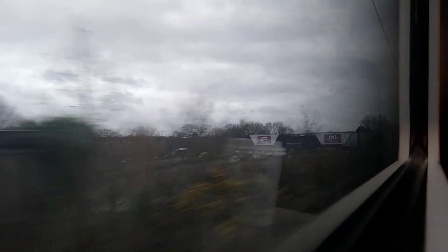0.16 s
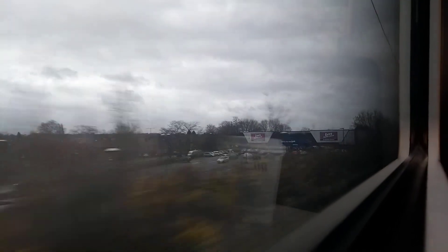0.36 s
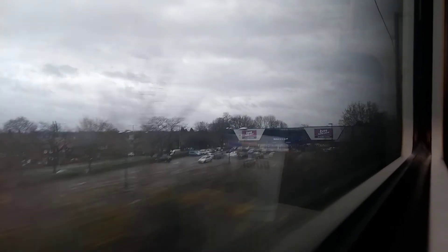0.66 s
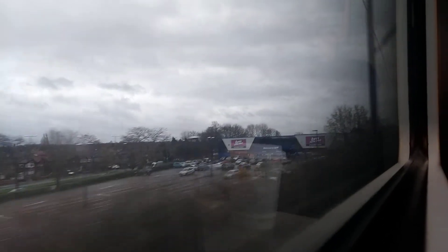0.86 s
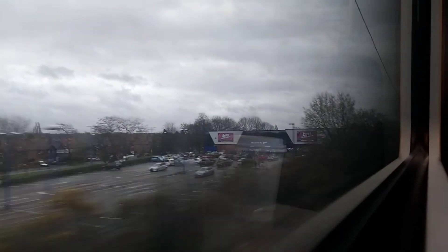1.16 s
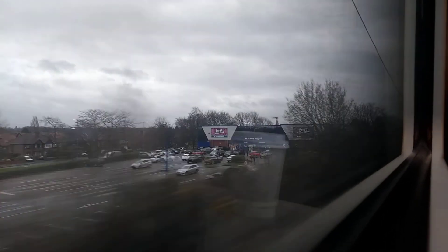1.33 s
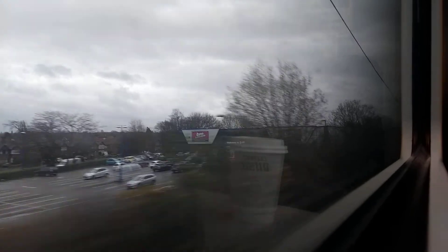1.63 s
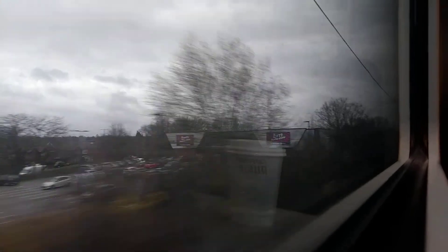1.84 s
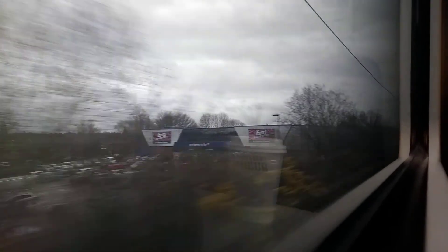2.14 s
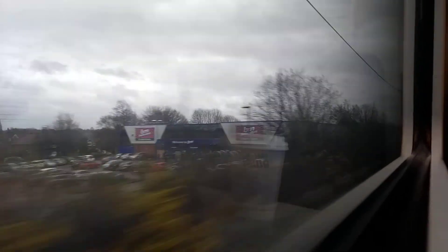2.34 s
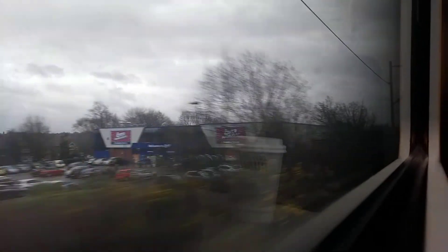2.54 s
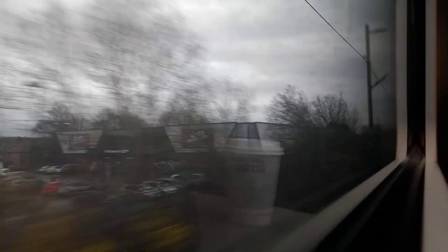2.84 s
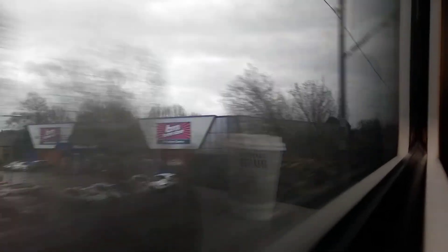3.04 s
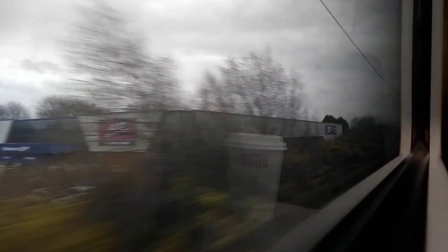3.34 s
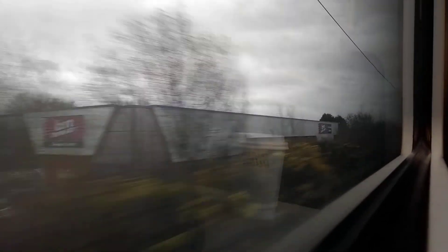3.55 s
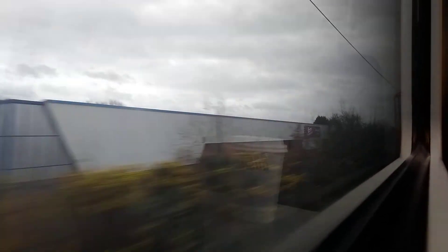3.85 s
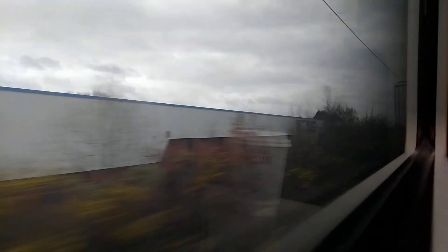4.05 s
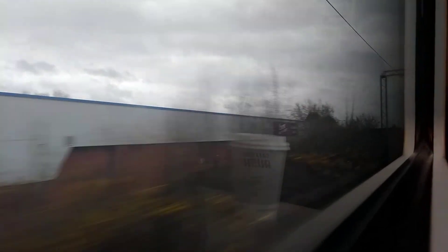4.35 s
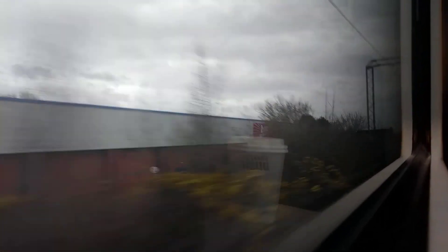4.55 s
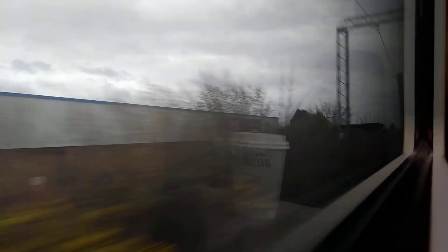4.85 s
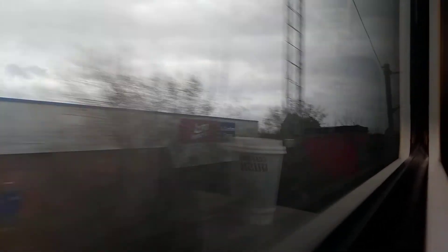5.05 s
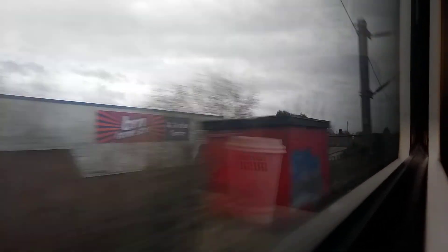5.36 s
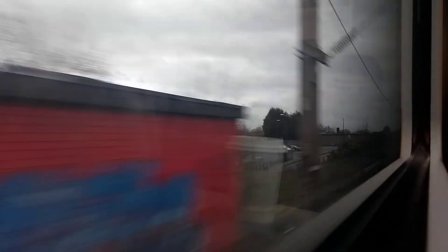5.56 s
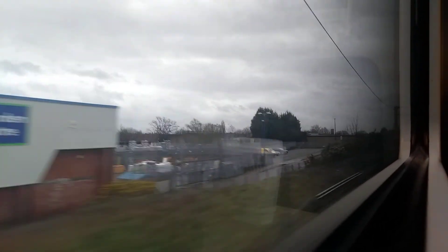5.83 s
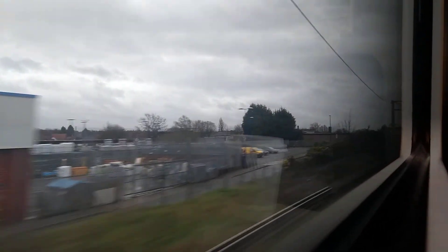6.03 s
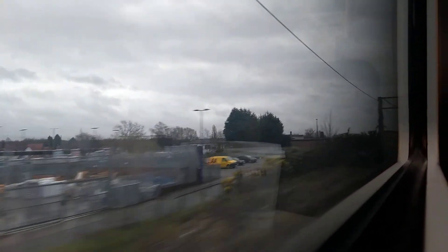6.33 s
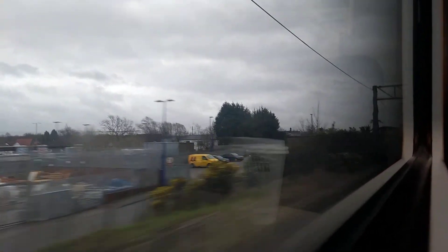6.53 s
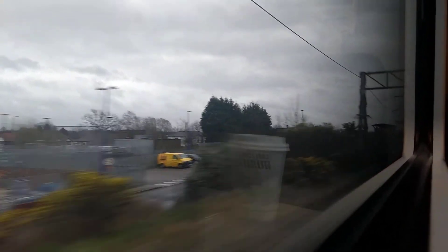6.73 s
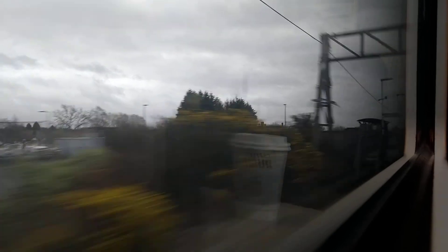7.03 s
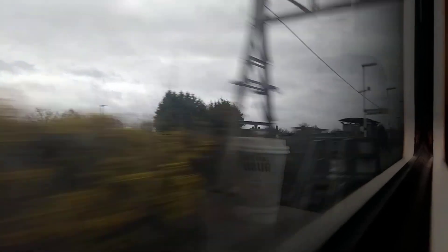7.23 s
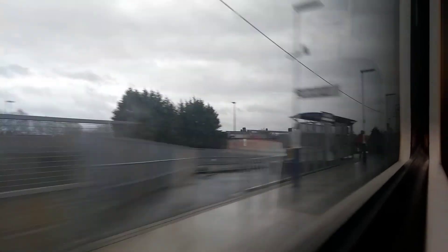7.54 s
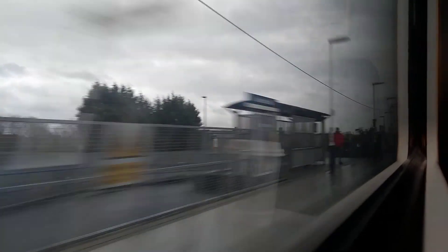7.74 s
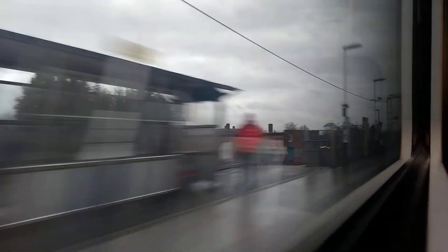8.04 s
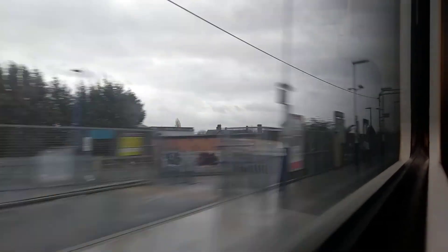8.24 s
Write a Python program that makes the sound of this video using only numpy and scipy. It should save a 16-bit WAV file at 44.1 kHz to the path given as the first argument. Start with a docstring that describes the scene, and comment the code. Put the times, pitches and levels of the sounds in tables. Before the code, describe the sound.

Inside a moving electric train, heavy low rumble and wheel roar continue throughout, coloured by faint wavering motor and gear tones. A thin trim squeal opens, with a jolt under it. A sharp snap suddenly dips the whole sound, which creeps back. Thin material rustles and crinkles close to the microphone; a second, stronger snap at four seconds ducks everything again. Knocks, booms and tiny chirps follow until the cut.

```python
"""Inside a fast electric train: wheels rumble and roar through the carriage, as noise that rings in floor and panels.
Gears, motor, drone and passing tones of wheels and drive are wavering sines; rubbing trim squeaks or scrapes.
Something thin rustles close by in grains; jolts knock and boom; the camera ticks and whirs faintly.
Two sharp snaps overload the microphone; its gain control ducks at once and creeps back up.
The right channel is of opposite polarity and slightly offset in time."""
import sys
import numpy as np
from scipy import signal
from scipy.fft import rfft, irfft, next_fast_len
from scipy.io import wavfile
from scipy.ndimage import uniform_filter1d, map_coordinates

SR = 44100
rng = np.random.default_rng(int(sys.argv[2]) if len(sys.argv) > 2 else 0)


def materialize(psi):
    """Save the field psi as 16-bit PCM at rate SR to the path in sys.argv[1].

    A 1-D psi becomes a single channel; in a 2-D psi each row is a channel.
    """
    bounded = np.clip(np.atleast_2d(psi).T, -1, 1)
    quanta = np.round(bounded * 32767).astype(np.int16)
    wavfile.write(sys.argv[1], SR, quanta)


N = 369980
PORT_DELAY_S = .000427  # between the two microphone ports


def amp(db):
    """Decibels to gain."""
    return 10 ** (np.asarray(db) / 20)


def unit(x):
    """Scale to rms 1."""
    return x / np.sqrt(np.mean(x ** 2) + 1e-20)


def clock():
    """Time of every sample, s."""
    return np.arange(N) / SR


def along(points, hz):
    """Read (f/Hz, value) points on a log frequency axis."""
    f, v = np.transpose(points)
    return np.interp(np.log(hz + 1), np.log(f + 1), v)


def curves(rows):
    """One value per sample for each column after the time."""
    s, *cols = np.transpose(rows)
    return [np.interp(clock(), s, c) for c in cols]


def wobble(knots_per_s):
    """Smooth random curve through normal knots."""
    knots = rng.standard_normal(int(N * knots_per_s / SR) + 4)
    return map_coordinates(knots, [clock() * knots_per_s])


def cycle(hz):
    """Running phase of a moving pitch, rad."""
    return 2 * np.pi * np.cumsum(hz) / SR


def filtered(x, response):
    """x times a response of frequency."""
    size = next_fast_len(N + SR // 2)
    spectrum = rfft(x, size) * response(np.fft.rfftfreq(size, 1 / SR))
    return irfft(spectrum, size)[..., :N]


def white():
    """Two unrelated noises."""
    return rng.standard_normal((2, N))


def patchy(x, depth_db):
    """Random gain patches a few hundred Hz wide and a few tens of ms long."""
    z = signal.stft(x, nperseg=512)[2]
    field = rng.standard_normal(z.shape[1:])
    field = uniform_filter1d(field, size=3, axis=0)
    field = uniform_filter1d(field, size=5, axis=1)
    return signal.istft(z * amp(depth_db * unit(field)), nperseg=512)[1][:, :N]


def burst(s, attack_s, t60_s):
    """Envelope that rises at time s and dies away."""
    age = np.arange(SR // 2) / SR
    shape = (1 - np.exp(-age / attack_s)) * amp(-60 * age / t60_s)
    return np.pad(shape, (round(s * SR), N))[:N]


def swell(s, length_s):
    """Envelope of one slip: grips fast, lets go slowly."""
    u = np.clip((clock() - s) / length_s, 0, 1)
    return np.sin(np.pi * u ** 0.43) ** 2


def held(s, length_s, attack_s, release_s):
    """Envelope that rises from time s, holds until length_s is over and dies away."""
    age = clock() - s
    return np.clip(age / attack_s, 0, 1) * np.exp(-np.maximum(age - length_s, 0) / release_s)


# floor and panel resonances: f/Hz, width/Hz, lift/dB
PANEL_MODES = [(126, 33, 2), (226, 18, -0.5), (301.9, 5.3, 7), (396.5, 6.2, 7), (603, 34, 4.5),
               (657, 74, 2.5), (471, 32, -6), (766, 44, -3.5)]
# share of sound along the line of the ports: f/Hz, share/0-1
AXIAL_SHARE = [(100, 1), (500, .98), (1900, 1), (4900, 1), (5900, .92), (7100, .87), (8300, .68),
               (13000, .6)]
# part of that share reaching the right port first: f/Hz, share/0-1
BACKWARD_SHARE = [(600, 0.01), (1100, 0), (1800, 0), (4200, 0.17), (6600, 0.33), (7700, 0.16), (9000, 0.9),
                  (12600, .67)]


def cabin(drive, colour):
    """Stereo field of rms 1, ringing in the panels; axial sound from both ways hollows it at even pitch steps."""
    def gain(hz):
        lift_db = sum(db / (1 + (2 * (hz - centre) / width) ** 2) for centre, width, db in PANEL_MODES)
        return amp(along(colour, hz) + lift_db)

    def response(hz):
        back = np.clip(along(BACKWARD_SHARE, hz), 0, 1)
        axial = np.clip(along(AXIAL_SHARE, hz), 0, 1)
        # twice the port delay: early here, late again in record()
        alike = axial * (1 - back + back * np.exp(4j * np.pi * PORT_DELAY_S * hz))
        unlike = np.sqrt(np.abs(1 - np.abs(alike) ** 2))
        return gain(hz) * np.array([np.ones_like(hz), alike, unlike])

    left, shared, apart = filtered(drive[[0, 0, 1]], response)
    return unit(np.array([left, shared + apart]))


# rail roughness, as wheel loudness: t/s, level over usual/dB
RAIL_ROUGHNESS = [(0, 0.5), (.45, 1), (.72, -0.6), (.92, -0.5), (1.2, 2.5), (1.5, -2), (2.05, 1), (2.3, -3),
                  (2.62, 1), (3.05, 0.8), (3.3, 1), (3.5, -1.5), (3.62, -3), (3.95, 2.5), (4.3, 0),
                  (4.85, 4.5), (5.42, -1), (5.68, 1), (6.05, 1), (6.85, 2.5), (7.1, 1.5), (7.8, 2),
                  (8.39, 1)]
# deepest part of the rumble: t/s, level over usual/dB
DEEP_LEVEL = [(0, -3), (1.4, 2.5), (2.2, -4.5), (2.8, 0), (3.3, 0.5), (4.2, -1), (5.3, 0.5), (6, 0.5),
              (6.7, -0.5), (7.5, 0.5), (8.39, 4.5)]
# relative spectra of body rumble, wheel roar, air: f/Hz, level/dB
RUMBLE_SPECTRUM = [(12, -54), (22, -43), (35, -14), (50, -10.5), (75, 0), (105, -1.5), (135, 0), (165, -6),
                   (220, -5), (330, -16), (450, -37), (800, -80)]
ROLL_SPECTRUM = [(150, -36), (280, -0.5), (370, 0.5), (450, 3), (560, 0), (680, -2.5), (770, -5.5),
                 (1150, -12.5), (1420, -10), (1750, -15), (2200, -22.5), (3500, -25), (8000, -82)]
HISS_SPECTRUM = [(900, -14), (2000, -17), (2900, 19.5), (3500, -6), (4400, 14.5), (5000, 6.5), (7000, 9.5),
                 (8200, -2), (10000, 2), (12000, -10), (14500, -34)]
RUMBLE_DB, ROLL_DB, HISS_DB = -22.5, -35.5, -52  # usual levels
RUMBLE_DB_PER_RAIL_DB, HISS_DB_PER_RAIL_DB = 0.53, 0.81
DEEP_HZ = 95


def running():
    """Rail roughness shakes the body and makes the wheels roar; air hisses along the carriage."""
    rail_db, = curves(RAIL_ROUGHNESS)
    deep_db, = curves(DEEP_LEVEL)
    rumble_db = RUMBLE_DB + RUMBLE_DB_PER_RAIL_DB * rail_db + 1.03 * wobble(11)
    rumble = amp(rumble_db) * cabin(white(), RUMBLE_SPECTRUM)
    deep = filtered(rumble, lambda hz: 1 / (1 + (hz / DEEP_HZ) ** 10))
    roll_db = ROLL_DB + rail_db + 0.093 * wobble(8.4)
    roll = amp(roll_db) * cabin(patchy(white(), depth_db=1.5), ROLL_SPECTRUM)
    hiss_db = HISS_DB + HISS_DB_PER_RAIL_DB * rail_db + 0.12 * wobble(3.1)
    hiss = amp(hiss_db) * cabin(white(), HISS_SPECTRUM)
    return rumble + (amp(deep_db) - 1) * deep + roll + hiss


# gear mesh tone: t/s, f/Hz, level/dB, overtones re tone/dB
GEAR_TONE = [(0, 642, -42.5, -12), (1.2, 647.6, -46.5, -12), (2.3, 648.3, -47.5, -8.5), (3, 652, -43, -14),
             (3.5, 658, -52, -4), (4, 661, -44, -17), (4.8, 661.7, -42, -7), (5.3, 663, -39, -11.5),
             (5.75, 664.4, -40, -9), (6.3, 668, -52, -3.5), (7.1, 667.5, -50, -16), (7.5, 665.7, -43, -23),
             (8.39, 664.7, -46, -26)]
# motor hum: t/s, f/Hz, level/dB, third harmonic re tone/dB
MOTOR_TONE = [(0, 483, -48.5, -20), (.85, 486.4, -44, -23), (2.2, 490.7, -51.5, -15),
              (5.3, 495.4, -51, -30), (5.6, 506.6, -43, -22), (5.9, 506, -52, -22), (6.3, 502.5, -39, -28),
              (6.95, 505.7, -41, -30), (7.15, 502, -46, -25), (7.85, 504.7, -37.5, -20),
              (8.39, 505, -43.5, -22)]
# lower drone of the drive: t/s, f/Hz, level/dB
DRIVE_DRONE = [(0, 363.4, -56), (4.2, 363.6, -47), (4.9, 368.7, -44.5), (6, 372, -44.5),
               (7.6, 375.4, -42.5), (8.39, 373.8, -46.5)]
GEAR_WAVER_HZ, GEAR_FLUTTER_DB = 2.2, 1.9


def traction():
    """Gear and motor tones and a lower drone waver as they travel through the shaking body."""
    gear_hz, gear_db, over_db = curves(GEAR_TONE)
    mesh = cycle(gear_hz + GEAR_WAVER_HZ * wobble(30))
    upper = np.sin(2 * mesh) + amp(-8) * np.sin(2.48 * mesh)
    gear = np.sin(mesh) + amp(over_db + 1.6 * wobble(11)) * upper
    gear = amp(gear_db + GEAR_FLUTTER_DB * wobble(12)) * gear

    motor_hz, motor_db, third_db = curves(MOTOR_TONE)
    shaft = cycle(motor_hz + 2.09 * wobble(20))
    motor = np.sin(shaft) + amp(third_db) * np.sin(3 * shaft)
    motor = amp(motor_db + 1.7 * wobble(16)) * motor

    drone_hz, drone_db = curves(DRIVE_DRONE)
    drone = amp(drone_db + 2.6 * wobble(9)) * np.sin(cycle(drone_hz + 2 * wobble(20)))
    return np.sqrt(2) * (gear + motor + drone)


# passing tones of wheels and drive: t/s, f/Hz, level/dB, octave re tone/dB, length/s
PASSING_TONES = [(0, 596.6, -46, -25, 1.4), (1.852, 603, -39.5, -22, .35), (2.1, 630.4, -47.5, -16, 2.3),
                 (2.3, 604, -46.5, -29, 1.7), (2.853, 1494, -50, -30, 0.28), (2.8, 1437, -52.5, -30, 0.43),
                 (4.704, 610, -36, -22, 0.23), (6.3, 1198, -53.5, -30, 0.63), (6.403, 605, -35, -24, 0.12),
                 (6.748, 598, -41, -22, 0.15), (7.55, 1516, -52, -32, 0.58), (8.028, 600, -39.5, -25, 0.3)]
PASSING_FADE_S = 0.068


def passing_tones():
    """A narrow, unsteady tone of wheel or drive and its octave."""
    out = np.zeros(N)
    for s, hz, db, octave_db, length_s in PASSING_TONES:
        phase = cycle(hz + 5.48 * wobble(40))
        tone = np.sin(phase) + amp(octave_db) * np.sin(2 * phase)
        envelope = held(s, length_s, PASSING_FADE_S, PASSING_FADE_S)
        out += amp(db + 1.5 * wobble(18)) * envelope * tone
    return np.sqrt(2) * out


# floor and panel booms over uneven track: t/s, level/dB, f/Hz, length/s
PANEL_BOOMS = [(0.453, -34, 388, 0.12), (0.474, -25, 214.8, 0.12), (1.317, -30, 245, 0.45),
               (3.345, -37.5, 392, 0.13), (6.729, -23.5, 238.6, 0.11), (6.77, -37.5, 389, 0.39),
               (3.355, -19, 128, 0.14), (3.44, -16.5, 127, 0.14), (4.286, -23.5, 125, 0.36),
               (6.133, -22.5, 130, 0.17), (6.937, -24, 129.9, 0.14)]


def booms():
    """One resonance of the floor or a panel swells for a moment."""
    out = np.zeros(N)
    for s, db, hz, length_s in PANEL_BOOMS:
        tone = np.sin(cycle(hz + 6 * wobble(40)))
        out += amp(db + 1.6 * wobble(30.4)) * swell(s, length_s) * tone
    return np.sqrt(2) * out


# carriage knocks: t/s, level/dB, f/Hz above which the spectrum falls, t60/s
TRACK_KNOCKS = [(0.491, -16, 220, 0.17), (3.335, -26, 252, 0.21), (3.762, -25, 120, 0.07),
                (4.798, -15.5, 252, 0.13), (6.456, -21, 234, 0.12), (6.528, -24, 1490, 0.16),
                (6.984, -30, 222, .08)]
KNOCK_ATTACK_S = .0015


def knocks():
    """Jolts from the track thud in the floor and fittings."""
    out = np.zeros((2, N))
    for s, db, hz, t60_s in TRACK_KNOCKS:
        colour = [(hz / 4, -30), (hz * 0.2, 0), (hz, -2), (hz * 1.03, -7), (hz * 4, -22), (hz * 10, -60)]
        out += amp(db) * burst(s, KNOCK_ATTACK_S, t60_s) * cabin(white(), colour)
    return out


# trim squeal track: t/s, f/Hz, level/dB
SQUEAL_TRACK = [(0, 2880, -85), (.09, 2880, -56), (.168, 2885, -42), (.2, 2890, -56), (.235, 2926, -44),
                (.3, 2926, -45), (.32, 2885, -50), (.335, 2868, -39), (.385, 2866, -37), (.41, 2862, -42),
                (.48, 2861, -39.5), (.54, 2859, -42.5), (.652, 2856, -40.5), (.668, 2870, -55),
                (.79, 2935, -47), (.92, 2870, -56), (1.05, 2860, -110)]
# short trim chirps: t/s, f/Hz, level/dB, length/s
CHIRPS = [(0.785, 3030, -33, 0.045), (0.793, 3270, -45, 0.1), (4.784, 3036, -23, 0.072),
          (6.196, 3029, -25.5, 0.039)]
# chirp harmonics 1-4: level/dB
CHIRP_HARMONICS_DB = [-6.5, -18, -19, -24]
SQUEAL_JITTER_HZ, SQUEAL_WAVER_HZ, CHIRP_JITTER_HZ = 5.8, 2.1, 32


def squeaks():
    """Stick-slip near 3 kHz: a thin squeal that swells, steps in pitch and trails off, and short chirps."""
    squeal_hz, squeal_db = curves(SQUEAL_TRACK)
    unsteady_hz = squeal_hz + SQUEAL_JITTER_HZ * wobble(540) + SQUEAL_WAVER_HZ * wobble(36.4)
    out = amp(squeal_db + 1.6 * wobble(51.6)) * np.sin(cycle(unsteady_hz))
    for s, hz, db, length_s in CHIRPS:
        phase = cycle(hz + CHIRP_JITTER_HZ * wobble(600))
        tone = sum(amp(d) * np.sin(k * phase) for k, d in enumerate(CHIRP_HARMONICS_DB, start=1))
        out += amp(db) * swell(s, length_s) * tone
    return np.sqrt(2) * out


# dry trim scrapes: t/s, level/dB, centre f/Hz, length/s
TRIM_SCRAPES = [(0.032, -46.5, 3180, 0.067), (0.676, -41.5, 3060, 0.14), (0.736, -41.5, 2690, 0.36),
                (0.805, -71, 4350, 0.12), (1.335, -43, 5700, 0.05), (1.367, -42, 7100, 0.087),
                (1.675, -43.5, 4700, 0.06), (2.789, -34.5, 3200, 0.056), (3.809, -33, 3380, 0.058),
                (4.825, -44, 3500, 0.13), (6.224, -43.5, 3770, 0.061), (7.882, -34, 4500, 0.05),
                (8.07, -42, 4300, 0.076), (8.129, -40.5, 4000, 0.047)]


def scrapes():
    """Trim slides without singing: irregular slips spread the squeak into a ragged band."""
    out = np.zeros((2, N))
    slips = patchy(white(), depth_db=2.0)
    for s, db, hz, length_s in TRIM_SCRAPES:
        colour = [(hz * .4, -40), (hz * .7, -12), (hz * .92, 0), (hz * 1.25, -5), (hz * 2, -13), (hz * 4, -26)]
        out += amp(db) * swell(s, length_s) * cabin(slips, colour)
    return out


# strokes of the rustling material: t/s, level/dB, length/s
RUSTLE_STROKES = [(0, -53, 0.57), (0.94, -43.5, 0.13), (1.14, -64, 0.24), (1.336, -46, 0.035),
                  (1.677, -44.5, 0.031), (2.475, -37.5, 0.25), (2.732, -35.5, 0.14), (2.895, -43.5, 0.13),
                  (3.072, -40.5, 0.25), (3.391, -35, 0.13), (3.667, -35, 0.058), (3.768, -43, 0.38),
                  (4.234, -36.5, 0.087), (4.363, -43, 0.13), (4.46, -37.5, 0.18), (4.688, -41.5, 0.22),
                  (4.898, -45, 0.17), (6.608, -46, 0.22), (6.871, -43, 0.15), (7.122, -46.5, 0.072),
                  (7.19, -38, 0.061), (7.689, -44, 0.11), (7.86, -41, 0.055), (8.074, -51, 0.08),
                  (8.215, -51, 0.14)]
# relative spectrum of the rustle: f/Hz, level/dB
RUSTLE_SPECTRUM = [(500, -3), (1400, -3), (2400, -6), (3200, 0.5), (4400, -2), (5800, -4), (7000, -1),
                   (8200, -8.5), (10000, -7.5), (12000, -6), (14500, -18)]
STROKE_ATTACK_S, STROKE_RELEASE_S = 0.028, 0.047
STIR_DB = -52.5  # faint stirring between strokes
CRACKLES_PER_S, CRACKLE_DB = 49, 11  # tiny creases that stand out of the grains


def rustle():
    """Thin material slides over itself in strokes, each a clump of tiny grains."""
    power = amp(STIR_DB) ** 2
    for s, db, length_s in RUSTLE_STROKES:
        power = power + (amp(db) * held(s, length_s, STROKE_ATTACK_S, STROKE_RELEASE_S)) ** 2
    grains = patchy(white(), depth_db=2.6) * amp(1.8 * wobble(1500))
    creases = white() * (rng.random(N) < CRACKLES_PER_S / SR)
    grains = grains + amp(CRACKLE_DB) * creases
    unsteady = amp(1.95 * wobble(30) + 1.38 * wobble(120))
    return np.sqrt(power) * unsteady * cabin(grains, RUSTLE_SPECTRUM)


# single crinkles: t/s, level before CRINKLE_LIFT_DB/dB, tick re spray/dB
CRINKLE_EVENTS = [(1.883, -42, 1), (2.245, -59, 0), (2.381, -41.5, -7), (2.494, -54, 1), (2.652, -38.5, 3),
                  (2.713, -48, -1), (2.954, -41, 5), (3.07, -32.5, -11), (3.155, -35, 2.5),
                  (3.281, -39.5, 13), (3.42, -52, 4), (3.638, -39, -10), (3.816, -34.5, -2),
                  (3.927, -35, 0), (4.046, -37.5, 6), (4.556, -34, 7), (4.595, -38.5, 9), (5.07, -46, 3),
                  (6.527, -39.5, -6), (6.65, -46.5, 0), (6.721, -48, 12), (6.813, -33, 0),
                  (6.978, -43.5, 9), (7.011, -52, 8), (7.081, -37, 6), (7.167, -43, -1), (7.211, -49, 4),
                  (7.231, -35.5, -6), (7.255, -43, 0), (7.694, -33.5, -8), (7.79, -46, 5),
                  (7.884, -31.5, 3), (7.989, -39.5, 5), (8.08, -46, 2), (8.134, -52, 5)]
# relative spectrum of the crinkles: f/Hz, level/dB
CRINKLE_SPECTRUM = [(600, -22), (1500, 0), (2400, -6), (3200, -1.5), (4200, -1.5), (5800, -1.5), (7000, 3),
                    (8200, -8.5), (10000, -6), (12000, -6), (14500, -10)]
CRINKLE_LIFT_DB = 3.5
SPRAY_ATTACK_S, SPRAY_T60_S, TICK_ATTACK_S, TICK_T60_S = .002, .13, .0002, .02


def crinkles():
    """Where the material buckles there is a bright tick and a short spray of grains."""
    envelope = np.zeros(N)
    for s, db, tick_db in CRINKLE_EVENTS:
        spray = burst(s, SPRAY_ATTACK_S, SPRAY_T60_S)
        tick = amp(tick_db) * burst(s, TICK_ATTACK_S, TICK_T60_S)
        envelope += amp(db + CRINKLE_LIFT_DB) * (spray + tick)
    grains = patchy(white(), depth_db=2) * amp(3.5 * wobble(900))
    return envelope * cabin(grains, CRINKLE_SPECTRUM)


# snaps at the microphone, ahead of gain control: t/s, spike re full scale/dB, ring re spike/dB
MICROPHONE_SNAPS = [(1.2977, 17.25, -29.9), (4.0004, 23.6, -24.2)]
# snap ring: f/Hz, level/dB, t60/s
SNAP_RING = [(1050, -12, .012), (4240, 0, .0073), (7570, -7.4, .0073)]
SPIKE_S, REBOUND_S, REBOUND_WIDTH_S, REBOUND_DB = .000232, .0005, .000257, -16.4


def lobe(u):
    """Squared-cosine pulse over -1 to 1."""
    return np.cos(np.pi / 2 * np.clip(u, -1, 1)) ** 2


def snaps():
    """Each snap is one very short pressure spike, a softer rebound and a brief bright ring."""
    out = np.zeros(N)
    for s, db, ring_db in MICROPHONE_SNAPS:
        age = clock() - s
        since = np.clip(age + SPIKE_S, 0, 1)
        ring = sum(amp(d - 60 * since / t60_s) * np.sin(2 * np.pi * hz * since) for hz, d, t60_s in SNAP_RING)
        spike = -lobe(age / SPIKE_S)
        rebound = amp(REBOUND_DB) * lobe((age - REBOUND_S) / REBOUND_WIDTH_S)
        out += amp(db) * (amp(ring_db) * ring + spike + rebound)
    return out


# runs of camera ticks, probably its focus drive: t/s, level/dB, length/s
TICK_RUNS = [(.1, -62, 1.5), (1.503, -67, .8), (4.9, -65, 0.64), (5.6, -62, 0.3), (5.979, -64, .4),
             (7.296, -62, 0.44)]
# relative spectrum of the ticks: f/Hz, level/dB
TICK_SPECTRUM = [(5000, -42), (9200, -14.5), (10400, 4.5), (11200, -1), (12300, -20)]
TICKS_PER_S, FOCUS_T60_S = 30, .022


def focus_ticks():
    """Runs of tiny, evenly spaced ticks, carried through the camera's case to each port."""
    runs = sum(amp(db) * held(s, length_s, attack_s=.03, release_s=0.026) for s, db, length_s in TICK_RUNS)
    since = clock() % (1 / TICKS_PER_S)
    decay = unit(amp(-60 * since / FOCUS_T60_S))
    ring = unit(filtered(white(), lambda hz: amp(along(TICK_SPECTRUM, hz))))
    return runs * amp(1.8 * wobble(26)) * decay * ring


# whirs that go with the ticking: t/s, peak level of each partial/dB, length/s
WHIR_EVENTS = [(1.94, -49, .09), (7.565, -48, 0.11)]
# whir partials: f/Hz
WHIR_PARTIALS_HZ = [10100, 11950]


def whirs():
    """Two rough, very high partials sound together for an instant."""
    pair = sum(np.sin(cycle(hz + 45 * wobble(500))) for hz in WHIR_PARTIALS_HZ)
    return pair * sum(amp(db) * swell(s, length_s) for s, db, length_s in WHIR_EVENTS)


# port response: f/Hz, left re right/dB, extra lag of right/rad
PORT_RESPONSE = [(40, 3.5, .11), (96.5, 3, .32), (204, 2.5, 0.68), (400, 2, 0.87), (700, 1.4, 0.37),
                 (1100, 1.2, .07), (1700, 1, 0), (2200, 0, 0), (2500, 0, 0), (3000, 1, 0), (3500, 0, 0),
                 (4700, 0, 0), (7500, -.6, .15), (12200, -3, 0)]


def scene():
    """Everything in the carriage; the bass leans left, the top treble right."""
    train = running() + traction() + passing_tones() + booms() + knocks()
    sound = train + squeaks() + scrapes() + rustle() + crinkles()
    ports = np.array(PORT_RESPONSE)

    def response(hz):
        lean = amp(np.outer([.5, -.5], along(ports[:, :2], hz)))
        lag = np.exp(-1j * np.outer([0, 1], along(ports[:, ::2], hz)))
        return lean * lag

    return filtered(sound, response) + snaps() + focus_ticks() + whirs()


def gain_control(x, release_db_per_s=16, attack_s=0.00034, ceiling_db=0):
    """Peaks over the ceiling push the gain down; it recovers at a steady dB rate."""
    level_db = 20 * np.log10(np.abs(x).max(axis=0) + 1e-9)
    excess_db = np.maximum(level_db - ceiling_db, 0)
    recovery_db = release_db_per_s * clock()
    cut_db = np.maximum.accumulate(excess_db + recovery_db) - recovery_db
    keep = np.exp(-1 / (attack_s * SR))
    return x * amp(-signal.lfilter([1 - keep], [1, -keep], cut_db))


TOP_HZ = 14300


def record(dry):
    """Right channel inverted and late by the port spacing; then gain control, clipping and band limit."""
    right = -filtered(dry[1], lambda hz: np.exp(-2j * np.pi * PORT_DELAY_S * hz))
    held_down = gain_control(np.array([dry[0], right]))
    clipped = held_down / (1 + np.abs(held_down / .97) ** 5) ** (1 / 5)
    return filtered(clipped, lambda hz: 1 / (1 + (hz / TOP_HZ) ** 240))


dry = scene()
out = record(dry)
materialize(out)
```